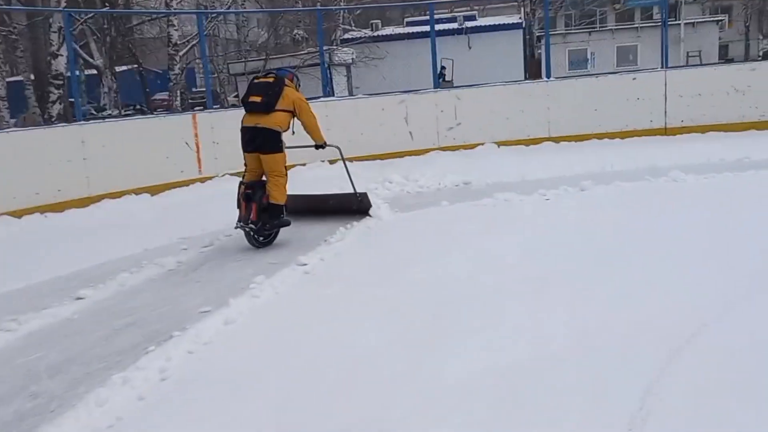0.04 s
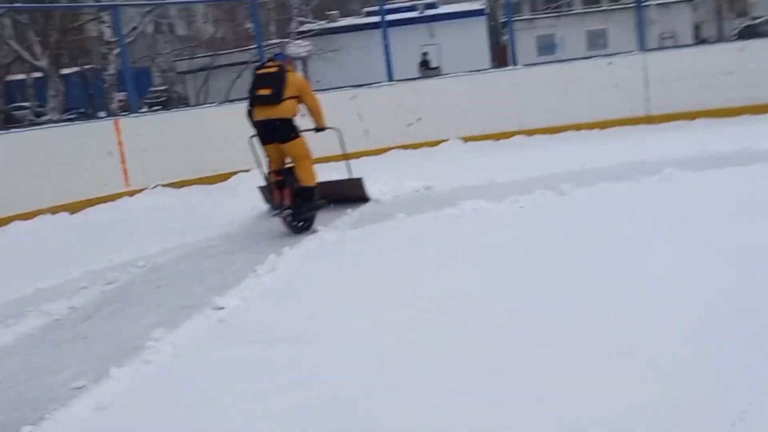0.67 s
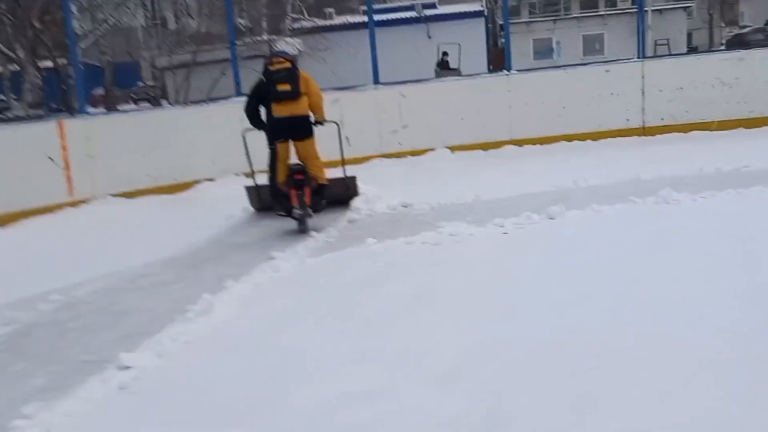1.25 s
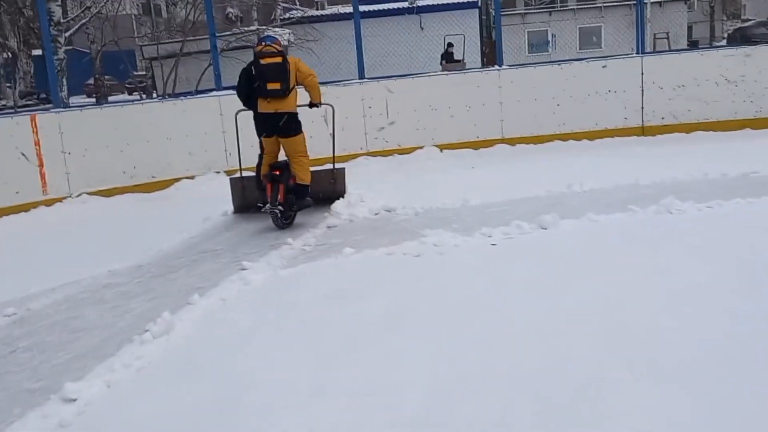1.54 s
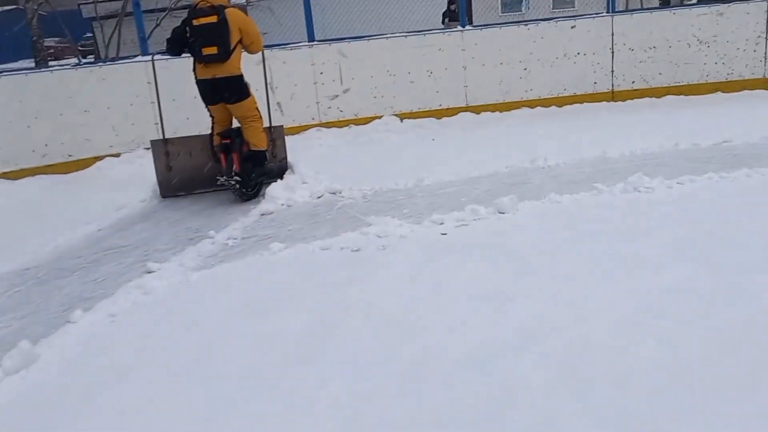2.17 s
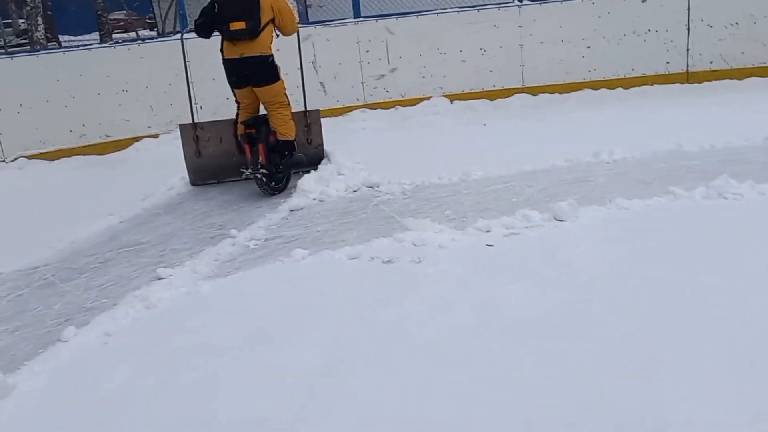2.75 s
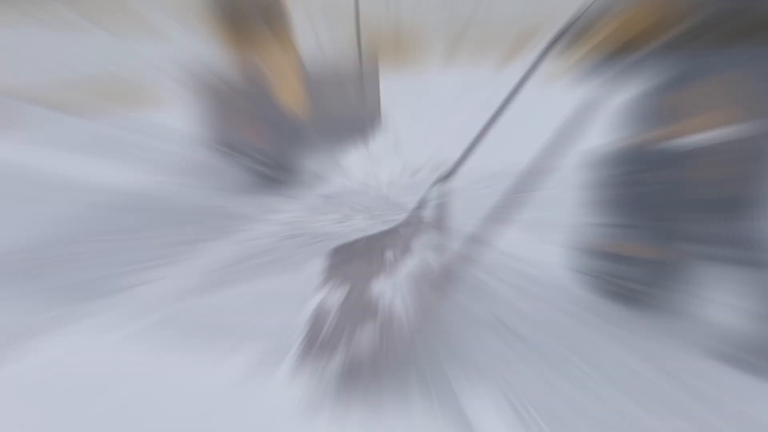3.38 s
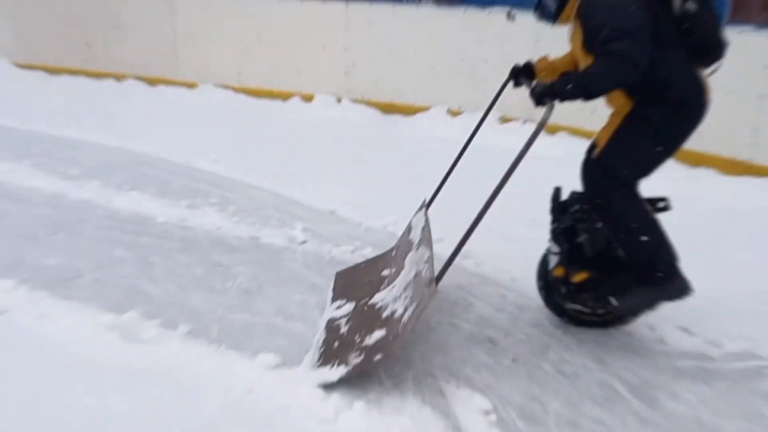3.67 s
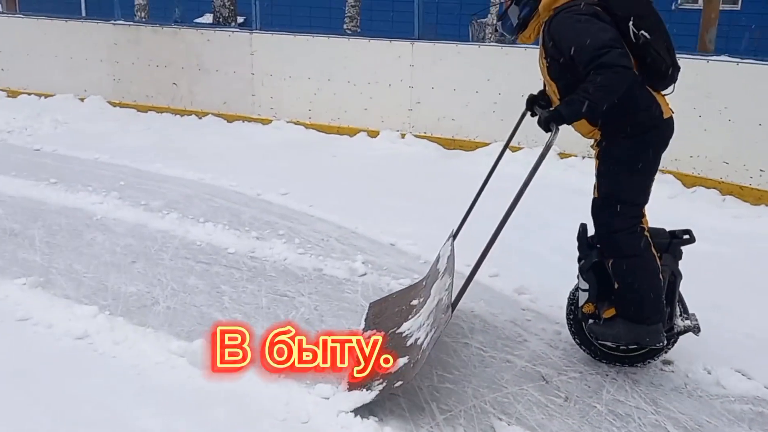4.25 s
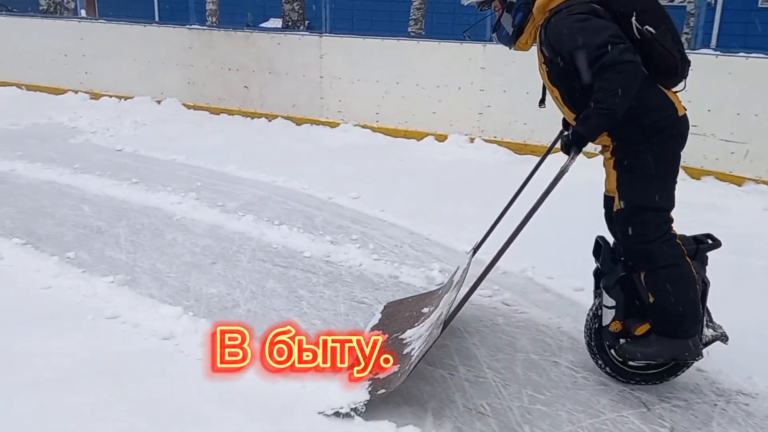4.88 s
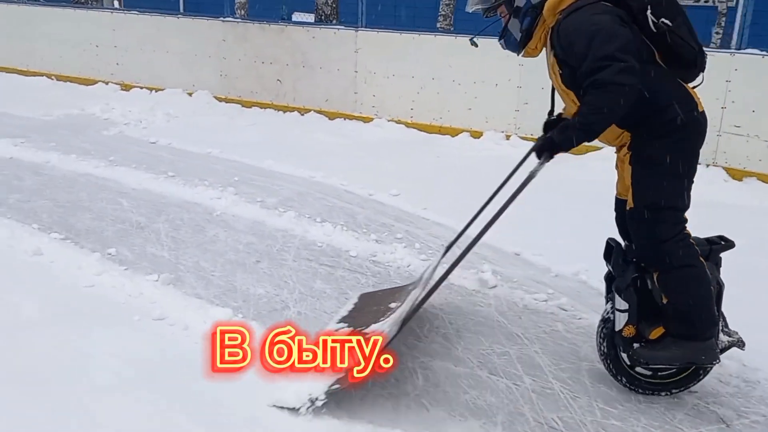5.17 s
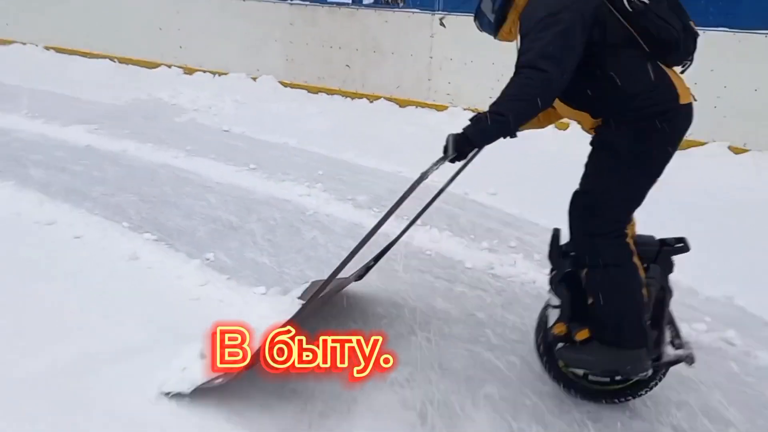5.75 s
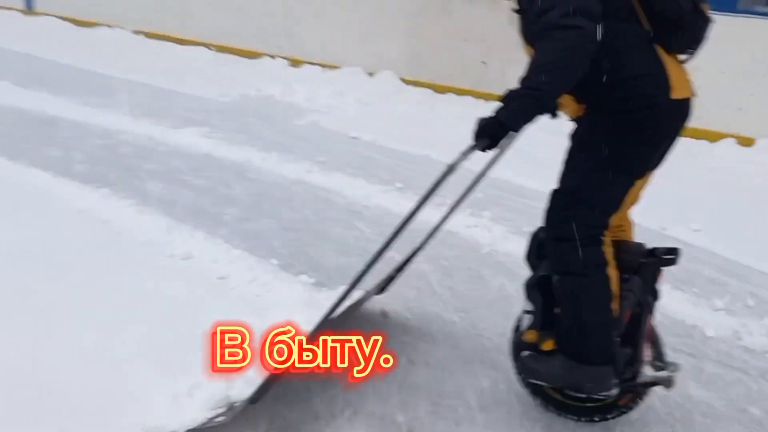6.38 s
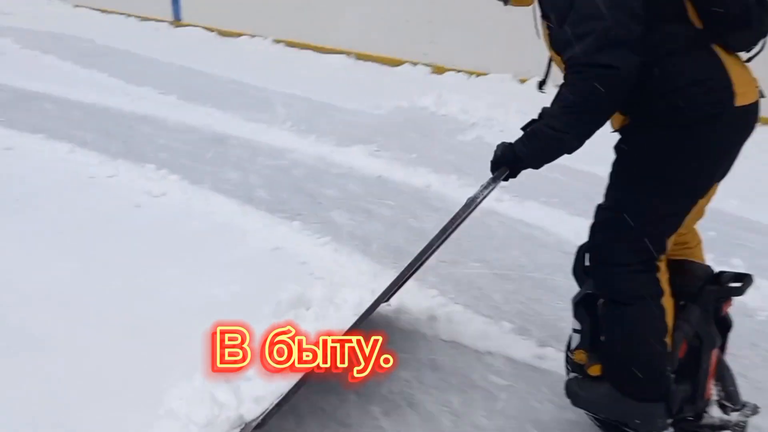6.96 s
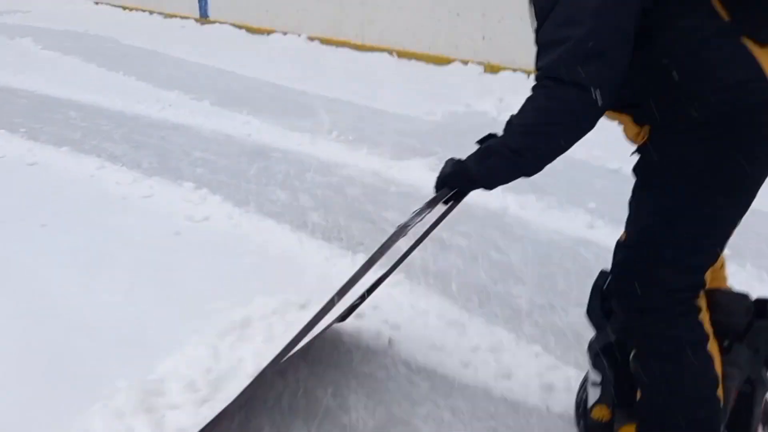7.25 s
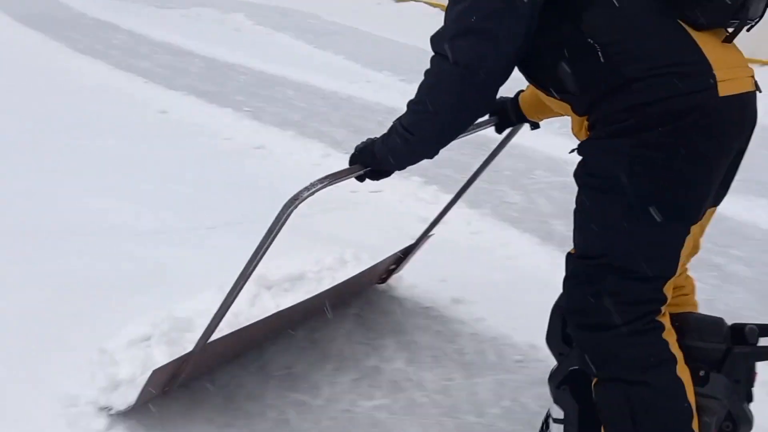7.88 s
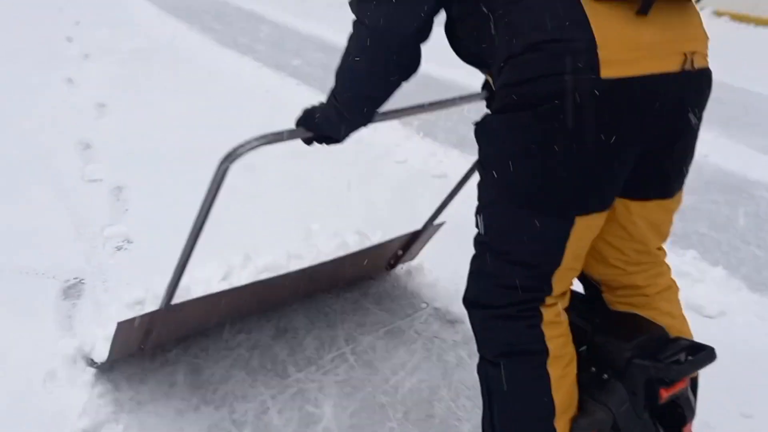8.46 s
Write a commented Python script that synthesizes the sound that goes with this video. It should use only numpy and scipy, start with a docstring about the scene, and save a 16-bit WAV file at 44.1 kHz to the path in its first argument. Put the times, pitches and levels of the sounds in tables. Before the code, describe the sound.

A wide metal scraper drones and rasps over an outdoor ice rink, with snow rumbling ahead of it. The first stroke fades to faint scuffs while wind thumps the microphone. The second knocks dully over ridges, then bites hard and passes close, hissing and squeaking as the snow builds into a heavier rumble. The scraping leans left, the gusts right.

```python
"""A wide metal snow scraper drones, rasps and hisses over an outdoor ice rink, in two strokes.
A rider on an electric unicycle pushes it. The blade's bite on the ice sets the level of scrape and
spray; the load of snow rumbles. The first stroke dies away at the boards, where the lifted blade
scuffs. The second knocks over ridges, squeaks, passes close by and gathers a heap.
Gusts buffet mainly the right microphone port."""
import sys
import numpy as np
from scipy import signal
from scipy.fft import rfft, irfft, next_fast_len
from scipy.io import wavfile
from scipy.ndimage import uniform_filter1d, minimum_filter1d, map_coordinates

SR = 44100
rng = np.random.default_rng(int(sys.argv[2]) if len(sys.argv) > 2 else 0)


def to_wav(sig):
    """Store sig (one row per channel, or 1-D mono) as 16-bit WAV at the path in sys.argv[1].

    Samples outside -1..1 are clipped; the rate is SR.
    """
    pcm = np.clip(np.atleast_2d(sig), -1, 1) * 32767
    pcm = np.round(pcm).astype(np.int16)
    wavfile.write(sys.argv[1], SR, pcm.T)  # frames by channels


N = 380141

# blade bite, easing off until it lifts at the boards: time_s, bite_db
FIRST_BITE = [(0.0, -22.3), (0.9, -22.3), (1.06, -29.5), (1.34, -34.5), (1.66, -45), (1.849, -45),
              (1.857, -55), (1.97, -51), (2.27, -61), (2.7, -57), (2.908, -48)]
# blade bite, digging in, lighter in the turn, then bearing down: time_s, bite_db
SECOND_BITE = [(2.912, -37), (3.25, -30.5), (3.471, -41), (3.99, -37.5), (4.219, -24.5), (4.32, -27.5),
               (4.58, -22), (5.39, -18.5), (5.631, -23), (5.84, -18.5), (8.62, -19)]
# how the rider is heard: time_s, behind_share, turning_share, close_share
RIDER_POSE = [(1.1, 1, 0, 0.26), (1.6, 0.059, 0.8, 0.022), (2.85, 0, 1, 0.35), (3, 0.51, 0.24, 0.95),
              (3.8, 0.83, 0.69, 0.07), (4.3, 0.23, 0.2, 0.73), (7.5, 0.093, 0, 0.85)]
# drone, rasp, hiss: low_hz, high_hz, full_bite_db, db_per_bite_db, turning_db, close_db, close_heap_db
SCRAPE_BANDS = [(390, 937, -20, 0.5648, -6, -0.66, 2.5), (1056, 2930, -26.5, 1.26, 13, 1.24, 2.5),
                (3360, 6640, -23.5, 0.95, -3, -0.081, -3)]
# crunch spectrum from across the rink: freq_hz, level_db
FAR_SPECTRUM = [(400, 7), (620, -3.5), (900, -5), (1500, 0), (2700, -7.5), (3800, -5.5), (5000, -8.5),
                (6000, -21), (6700, -27), (7300, -46), (8000, -75)]
# crunch spectrum close by: freq_hz, level_db
NEAR_SPECTRUM = [(400, -4), (620, -0.5), (900, -3), (1500, -4.5), (2700, -1), (3800, 0.5), (5000, -5.5),
                 (6000, -13.5), (6700, -20.5), (7300, -45.5), (8000, -87)]
# stereo balance from across the rink: freq_hz, left_minus_right_db
FAR_BALANCE = [(700, 0.5), (1500, 3), (2650, 6.5), (4400, 11), (5300, 13), (7000, 10)]
# stereo balance close by: freq_hz, left_minus_right_db
NEAR_BALANCE = [(300, -5), (520, 3.5), (850, 0), (1200, 4.5), (2500, 2.5), (3100, 6), (3900, 11),
                (5000, 16.5), (7000, 15)]
# likeness of the two ports: freq_hz, correlation
PORT_LIKENESS = [(60, .9), (150, .97), (600, .9), (1200, .62), (5000, .58), (9000, .2)]
# right port's lag behind the left: time_s, lag_ms
PORT_LAG = [(1.5, 0.12), (4, 0.062), (7.6, 0.16)]
# loaded blade's resonances from behind: centre_hz, width_hz, lift_db
BEHIND_MODES = [(471, 46, -15), (558, 150, 4), (867, 120, -9.5), (1060, 81, 5), (2200, 290, 5.5)]
# skimming blade's resonances: centre_hz, width_hz, lift_db
SKIM_MODES = [(785, 70, 5), (970, 130, -6), (1340, 110, 4), (2260, 320, 6)]
# loaded blade's resonances close by: centre_hz, width_hz, lift_db
CLOSE_MODES = [(445, 40, 11), (490, 60, 6), (570, 60, 4), (760, 110, 3), (1000, 110, -3.5), (1200, 200, 3),
               (1580, 120, -4.5), (1780, 110, -6), (1950, 170, 7), (2215, 110, -6), (2520, 190, 7.5),
               (2730, 120, -7), (2980, 170, 4.5)]
# half-buried blade's resonances: centre_hz, width_hz, lift_db
BURIED_MODES = [(490, 130, 4), (1180, 130, -3), (1420, 140, 5), (1660, 70, 4), (1800, 120, -10),
                (1960, 110, 5)]
# blade jolting over packed snow or hopping clear: start_s, length_s, lift_db
RIDGE_JOLTS = [(1.848, 0.052, -8.5), (3.555, 0.05, 4)]
# snow shoved ahead of the blade: time_s, rumble_db
SNOW_LOAD = [(0, -18), (1.3, -19.5), (1.55, -33), (2.05, -36.5), (2.3, -45.5), (2.8, -31), (3.05, -26),
             (3.55, -27), (4.05, -22), (4.3, -21.5), (5.35, -24.5), (5.6, -20.5), (6.5, -22), (7.3, -17.5),
             (8.62, -17.5)]
# tumbling snow: freq_hz, level_db
RUMBLE_SPECTRUM = [(20, -35.5), (45, -38.5), (62, -18.5), (80, -5), (190, -0.5), (250, -1.5), (330, -5),
                   (450, -16), (800, -37), (2000, -69.5)]
# flexing of blade and handle: centre_hz, width_hz, lift_db
FLEX_MODES = [(152.9, 13.3, 13)]
# flexing under a full heap: centre_hz, width_hz, lift_db
HEAPED_FLEX_MODES = [(170.3, 66, 6), (277, 19, 7)]
# powder spray: freq_hz, level_db
POWDER_SPECTRUM = [(6000, -28), (7700, -18.5), (9000, -3), (13800, -4.5), (14800, 5), (16000, -5.5)]
# gusts on the microphone: start_s, length_s, level_db, cutoff_hz
WIND_GUSTS = [(1.3, .39, -22, 140), (1.715, .135, -12, 900), (1.99, .07, -25, 160), (2.43, .4, -31, 300),
              (2.84, .06, -20, 300), (2.9, .06, -10, 250), (2.96, .5, -25, 130), (3.1, .08, -19, 120)]
# wind buffeting: freq_hz, level_db
WIND_SPECTRUM = [(20, -32), (48, -22), (80, 0), (220, -5), (400, -9), (700, -32), (4000, -60)]
# sharp ticks in the scrape: start_s, t60_s, level_db, treble_db
SCRAPE_TICKS = [(1.735, .05, -36, -45), (2.91, .014, -25, -14), (3.91, .012, -26, -9), (4.105, .25, -32, -10)]
# lifted blade brushing the ice: start_s, rise_s, centre_hz, level_db
BLADE_SCUFFS = [(1.945, .04, 1400, -42.5), (2.06, .06, 950, -44), (2.25, .02, 950, -45),
                (2.325, .04, 1500, -47), (2.48, .16, 1450, -47.5), (2.62, .07, 420, -35.5)]
# blows from ice ridges in the turn: start_s, level_db
RIDGE_KNOCKS = [(3.375, -19), (3.608, -17), (3.686, -11), (3.868, -12), (3.887, -11), (3.933, -12),
                (4.088, -13)]
# ring of knocked blade and handle: pitch_hz, level_db, t60_s
KNOCK_RING = [(162, 3.5, 0.094), (105, -9.5, 0.12), (236, -10, 0.066)]
# edge singing on bare ice: start_s, length_s, pitch_hz, width_hz, level_db
EDGE_SQUEAKS = [(3.825, .09, 5400, 1900, -39), (4.109, 0.028, 6050, 700, -32.5),
                (4.44, .99, 4275, 170, -27.5), (4.15, 1.27, 4750, 1000, -25), (4.5, .6, 4850, 220, -29.5),
                (7.13, .19, 1400, 130, -30), (7.15, .7, 2820, 220, -33), (7.52, .3, 2620, 150, -32),
                (7.9, .62, 2290, 160, -31.5), (7.85, 0.65, 4270, 400, -29.5)]
# hollow ring of the passing blade: time_s, left_centre_hz, lift_db
SWING_RING = [(6.5, 3100, 0), (7.1, 3270, 5), (7.75, 2600, 2.5), (8.62, 2150, 3)]

FULL_BITE_DB = -20.5  # an ordinary firm push
HEAP_START_S, HEAP_GROW_S, HEAP_HEAVY_S = 5.13, 2.3, 7.17
BURY_START_S, BURY_LENGTH_S = 6.65, 0.36  # the heap rises over the blade
TIME_S = np.arange(N) / SR


def amp(db):
    """Decibels to gain."""
    return 10 ** (np.asarray(db) / 20)


def unit(pair):
    """Scale a stereo pair so that its middle has rms 1."""
    return pair / np.sqrt(np.mean(pair.mean(0) ** 2) + 1e-20)


def along(points, hz):
    """(Hz, value) points read on a log axis."""
    f, v = np.transpose(points)
    return np.interp(np.log(hz + 1), np.log(f + 1), v)


def curves(rows):
    """One value per sample for each column after the time."""
    s, *cols = np.transpose(rows)
    return [np.interp(np.arange(N) / SR, s, c) for c in cols]


def wobble(rate):
    """A smooth random curve, rate knots a second."""
    return map_coordinates(rng.standard_normal(int(N * rate / SR) + 4), [np.arange(N) * rate / SR])


def filtered(x, response):
    """x times a complex response of frequency."""
    m = next_fast_len(N + SR // 2)
    return irfft(rfft(x, m) * response(np.fft.rfftfreq(m, 1 / SR)), m)[..., :N]


def narrow(hz, width_hz):
    """Resonance driven by rubbing: a narrow noise band."""
    phase = 2 * np.pi * np.cumsum(hz * np.ones(N)) / SR
    return ((wobble(width_hz) + 1j * wobble(width_hz)) * np.exp(1j * phase)).real


def register(x, low_hz, high_hz):
    """One steep band, at rms 1."""
    return unit(filtered(x, lambda hz: 1 / np.sqrt((1 + (low_hz / (hz + 1)) ** 16)
                                                   * (1 + (hz / high_hz) ** 16))))


def modes_db(modes, hz):
    """Summed lift of resonances."""
    return sum(db / (1 + (2 * (hz - centre_hz) / width_hz) ** 2) for centre_hz, width_hz, db in modes)


def burst(start_s, length_s, ramp_s):
    """Gate with linear ramps."""
    age_s = TIME_S - start_s
    return np.clip(np.minimum(age_s, length_s - age_s) / ramp_s + .5, 0, 1)


def delayed(x, ms):
    """Fractional delay of one channel."""
    return map_coordinates(x, [np.arange(N) - ms * SR / 1000])


def port_gains(balance, hz):
    """Left and right gains from a balance table."""
    return amp(along(balance, hz) * np.array([[.5], [-.5]]))


def ports(pair):
    """Make two unrelated signals partly alike; the left port leads."""
    def mix(hz):
        angle = np.arccos(np.clip(along(PORT_LIKENESS, hz), 0, 1)) / 2
        return np.array([np.cos(angle), np.sin(angle)])
    mid, side = filtered(pair, mix)
    return np.array([mid + side, delayed(mid - side, curves(PORT_LAG)[0])])


def bite_db():
    """Blade bite relative to a firm push."""
    return curves(np.vstack([FIRST_BITE, SECOND_BITE]))[0] - FULL_BITE_DB


def heap_share():
    """Snow piling up before the blade, 0 to 1."""
    return np.clip((TIME_S - HEAP_START_S) / HEAP_GROW_S, 0, 1)


def heavy_for_s():
    """Time since the heap became heavy."""
    return np.maximum(TIME_S - HEAP_HEAVY_S, 0)


def jolt_db():
    """Swell on a snow ridge, dip as the blade hops clear."""
    return sum(db * burst(start_s, length_s, ramp_s=0.025) for start_s, length_s, db in RIDGE_JOLTS)


def crunch(clicks_per_s, spread_db, rub_db, patchy_db, patch_frames):
    """Snow crystals break in dense clicks over smooth rubbing; narrow rings come and go."""
    breaks = rng.random((2, N)) < clicks_per_s / SR
    signs = rng.choice([-1, 1], (2, N))
    sizes = amp(spread_db * np.minimum(rng.exponential(size=(2, N)), 4))
    grit = unit(breaks * signs * sizes) + amp(rub_db) * unit(rng.standard_normal((2, N)))
    spectra = signal.stft(grit, nperseg=2048)[2]
    patches = uniform_filter1d(rng.standard_normal(spectra.shape[1:]), size=4, axis=0)
    patches = uniform_filter1d(patches, size=patch_frames, axis=1)
    return signal.istft(spectra * amp(patchy_db * patches / patches.std()), nperseg=2048)[1][:, :N]


def heard(grit, spectrum, balance, modes):
    """Crunch through the blade, reaching the ports from one place."""
    return filtered(grit, lambda hz: amp(along(spectrum, hz) + modes_db(modes, hz))
                    * port_gains(balance, hz))


def scrape(judder_hz=42, judder_db=.35, drone_judder_db=.9, damp_db_per_s=3.5):
    """The blade drones, rasps and hisses: harder bite is louder and brighter; the pressure judders."""
    grit = ports(crunch(clicks_per_s=3500, spread_db=2.5, rub_db=0, patchy_db=1.7, patch_frames=11))
    behind, turning, close = curves(RIDER_POSE)
    buried = np.clip((TIME_S - BURY_START_S) / BURY_LENGTH_S, 0, 1)
    places = [(behind, heard(grit, FAR_SPECTRUM, FAR_BALANCE, BEHIND_MODES)),
              (turning, heard(grit, FAR_SPECTRUM, FAR_BALANCE, SKIM_MODES)),
              (close * (1 - buried), heard(grit, NEAR_SPECTRUM, NEAR_BALANCE, CLOSE_MODES)),
              (close * buried, heard(grit, NEAR_SPECTRUM, NEAR_BALANCE, BURIED_MODES))]
    heap, voices = heap_share(), []
    for low_hz, high_hz, db, db_per_bite_db, turning_db, close_db, heap_db in SCRAPE_BANDS:
        band = sum(share * register(sound, low_hz, high_hz) for share, sound in places)
        place_db = turning_db * turning + close * (close_db * (1 - heap) + heap_db * heap)
        skim_db = 1.8 * turning * wobble(rate=24)  # a skimming blade touches on and off
        voices.append(amp(db + db_per_bite_db * bite_db() + place_db + skim_db) * band)
    drone, rasp, hiss = voices
    judder = narrow(judder_hz, width_hz=40)
    pressure = amp(0.7 * wobble(rate=20) + judder_db * judder)
    damping_db = damp_db_per_s * heavy_for_s()  # the heap presses on the blade
    drone = amp(jolt_db() - damping_db + drone_judder_db * judder) * drone
    return pressure * (drone + rasp + hiss)


def rumble():
    """Tumbling snow shakes the scraper; close by the handle hums, more broadly as the heap grows."""
    lumps = ports(crunch(clicks_per_s=900, spread_db=2.0, rub_db=1.5, patchy_db=1.0, patch_frames=6))

    def shaken(modes):
        return unit(filtered(lumps, lambda hz: amp(along(RUMBLE_SPECTRUM, hz) + modes_db(modes, hz))))
    close, heap = curves(RIDER_POSE)[2], heap_share()
    light = (1 - close) * shaken([]) + close * shaken(FLEX_MODES)
    body = (1 - heap) * light + heap * shaken(HEAPED_FLEX_MODES)
    return amp(curves(SNOW_LOAD)[0] + jolt_db() + 0.81 * wobble(rate=15)) * body


def powder(base_db=-48.5, db_per_bite_db=1.8, growth_db_per_s=4, close_db=-4.5, turning_db=-23):
    """Powder fizzes off the edge under a hard bite, most from a full heap."""
    fizz = filtered(rng.standard_normal((2, N)), lambda hz: amp(along(POWDER_SPECTRUM, hz)))
    _, turning, close = curves(RIDER_POSE)
    spray_db = base_db + db_per_bite_db * bite_db() + growth_db_per_s * heavy_for_s()
    place_db = close_db * close + turning_db * turning
    return amp(spray_db + place_db + 1.2 * wobble(rate=7.6)) * unit(fizz * amp([[2], [-2]]))


def wind(left_db=-19):
    """Gusts thump the right port and graze the left."""
    air, out = rng.standard_normal((2, N)), np.zeros((2, N))
    for start_s, length_s, db, cutoff_hz in WIND_GUSTS:
        buffet = filtered(air, lambda hz: amp(along(WIND_SPECTRUM, hz)) / (1 + (hz / cutoff_hz) ** 4))
        out += amp(db) * burst(start_s, length_s, ramp_s=0.029) * buffet / buffet.std()
    return out * amp([[left_db], [0]])


def scrape_ticks(treble_hz=6300, left_db=4, right_db=-10):
    """Sharp ticks: brief, decaying noise bursts in the scrape."""
    out = np.zeros(N)
    for start_s, t60_s, db, treble_db in SCRAPE_TICKS:
        envelope = amp(db - 60 * np.abs(TIME_S - start_s) / t60_s) * (TIME_S >= start_s)
        tick = envelope * rng.standard_normal(N)
        out += filtered(tick, lambda hz: np.where(hz < treble_hz, 1, amp(treble_db)))
    return out * amp([[left_db], [right_db]])


def scuffs(cutoff_hz=2400):
    """Light touches rattle the lifted blade: quick swell, longer fade, off to the left."""
    rattle = crunch(clicks_per_s=400, spread_db=2, rub_db=-6, patchy_db=3.5, patch_frames=3)[:1]
    out = np.zeros(N)
    for start_s, rise_s, centre_hz, db in BLADE_SCUFFS:
        age = np.maximum(TIME_S - start_s, 0) / rise_s
        band = filtered(rattle, lambda hz: 1 / (1 + (1.5 * np.log2((hz + 1) / centre_hz)) ** 4)
                        / (1 + (hz / cutoff_hz) ** 16))
        out += amp(db) * age * np.exp(1 - age) * unit(band)[0]
    return np.array([out, delayed(out, ms=.45) / 2])


def knocks(attack_s=0.0049):
    """Ice ridges give blade and handle dull, briefly ringing blows."""
    out, age_s = np.zeros(N), np.arange(SR // 2) / SR
    ring = sum(amp(db - 60 * age_s / t60_s) * np.sin(2 * np.pi * hz * age_s)
               for hz, db, t60_s in KNOCK_RING)
    blow = ring * (1 - np.exp(-age_s / attack_s))
    for start_s, db in RIDGE_KNOCKS:
        out[round(start_s * SR):][:len(blow)] += amp(db) * blow
    return out


def edge_squeaks(ramp_share=0.3):
    """The edge rubs bare ice and sings in narrow bands, the high ones further left."""
    out = np.zeros((2, N))
    for start_s, length_s, pitch_hz, width_hz, db in EDGE_SQUEAKS:
        sides = port_gains(NEAR_BALANCE, pitch_hz)
        envelope = amp(db) * burst(start_s, length_s, ramp_s=length_s * ramp_share)
        out += sides / sides.mean() * envelope * narrow(pitch_hz, width_hz)
    return out


def swing(pair, width_hz=480, trough_ratio=1.25, mirror_hz=3000):
    """The passing blade's hollow ring glides down on the left and, half as strong, up on the right."""
    hz, frame_s, spectra = signal.stft(pair, SR, nperseg=1024)
    time_s, *columns = np.transpose(SWING_RING)
    left_hz, db = [np.interp(frame_s, time_s, column) for column in columns]

    def ring_db(centre_hz):
        peak_and_trough = [(centre_hz, width_hz, db), (trough_ratio * centre_hz, width_hz, -db)]
        return modes_db(peak_and_trough, hz[:, None])
    gains = amp([ring_db(left_hz), ring_db(mirror_hz ** 2 / left_hz) / 2])
    return signal.istft(spectra * gains, nperseg=1024)[1][:, :N]


def scene():
    """Scraper and wind, in stereo."""
    return (swing(scrape()) + scuffs() + knocks() + rumble() + powder()
            + edge_squeaks() + scrape_ticks() + wind())


def record(dry):
    """A limiter eases the highest peaks down; a band limit cuts the top treble."""
    ceiling, top_hz = .95, 15870
    needed_gain = np.minimum(1, ceiling / (np.abs(dry).max(0) + 1e-9))
    gain = uniform_filter1d(minimum_filter1d(needed_gain, size=201), size=201)
    return filtered(dry * gain, lambda hz: hz < top_hz)


dry = scene()
out = record(dry)
to_wav(out)
```